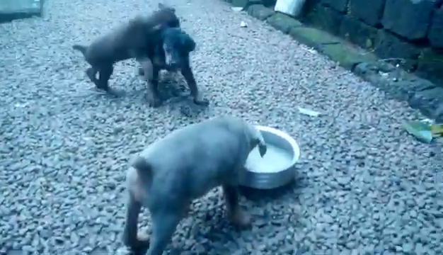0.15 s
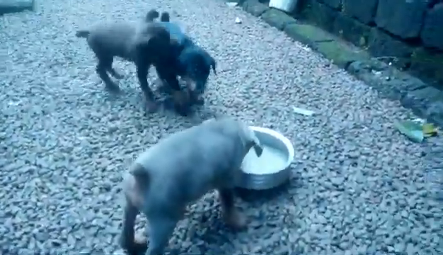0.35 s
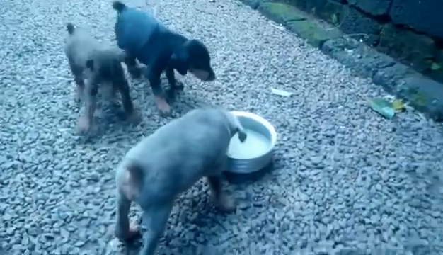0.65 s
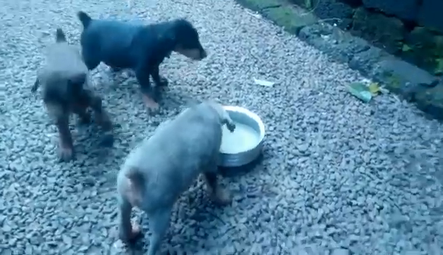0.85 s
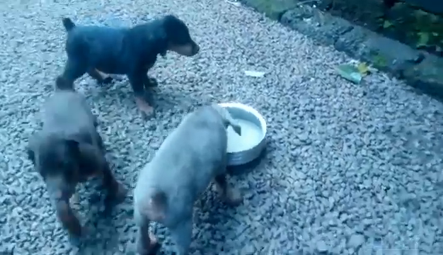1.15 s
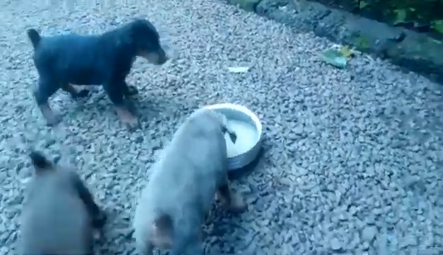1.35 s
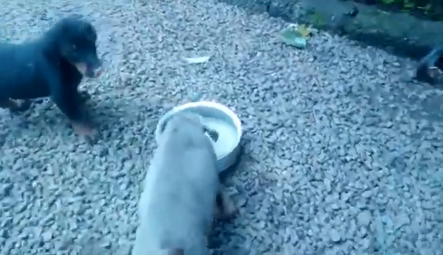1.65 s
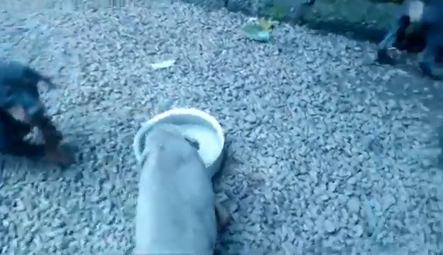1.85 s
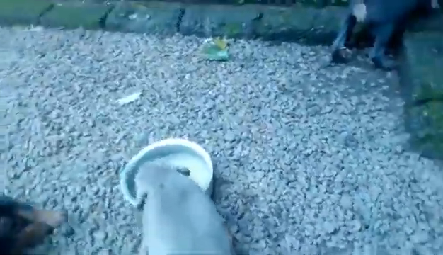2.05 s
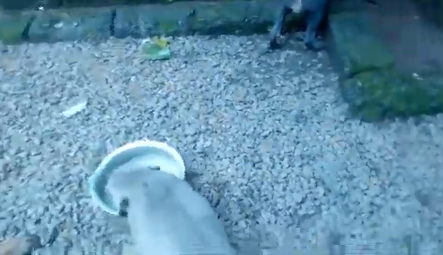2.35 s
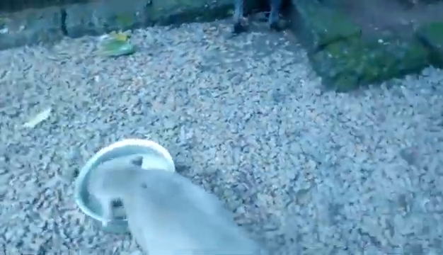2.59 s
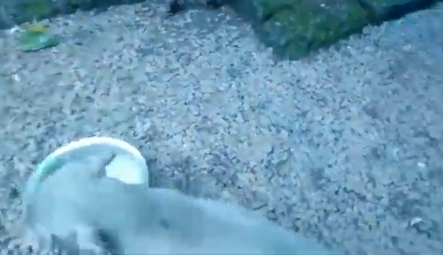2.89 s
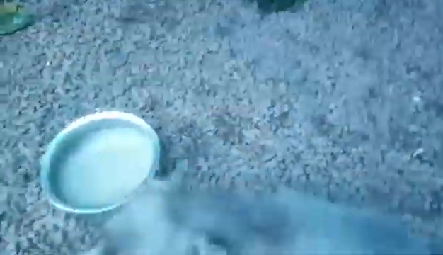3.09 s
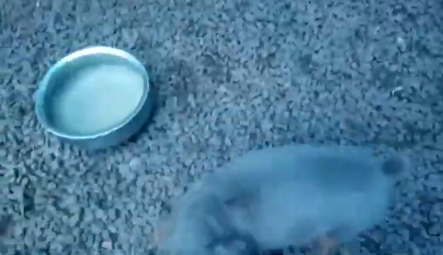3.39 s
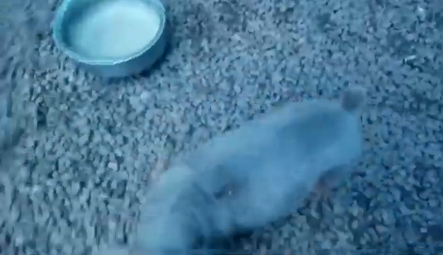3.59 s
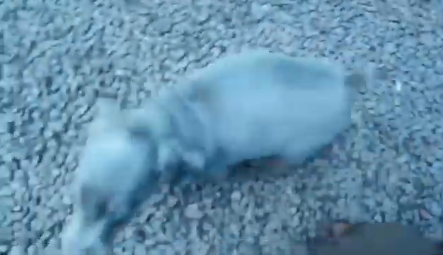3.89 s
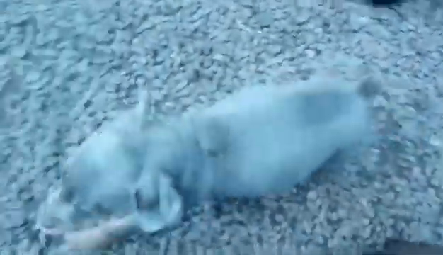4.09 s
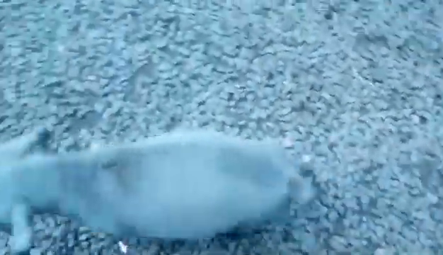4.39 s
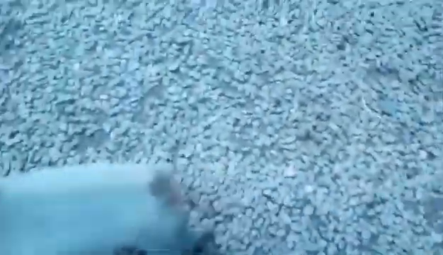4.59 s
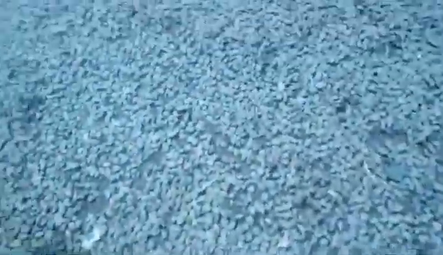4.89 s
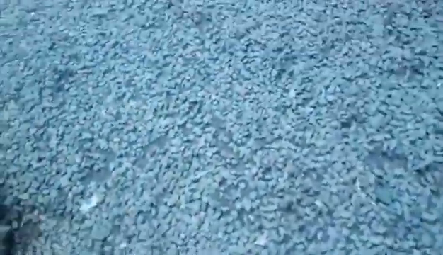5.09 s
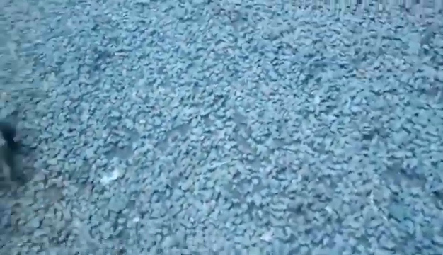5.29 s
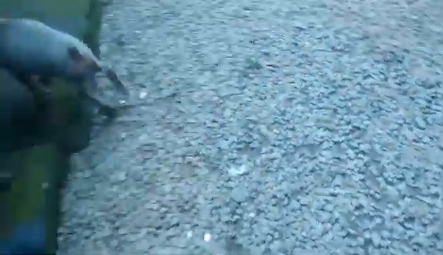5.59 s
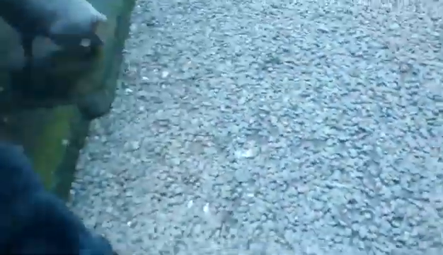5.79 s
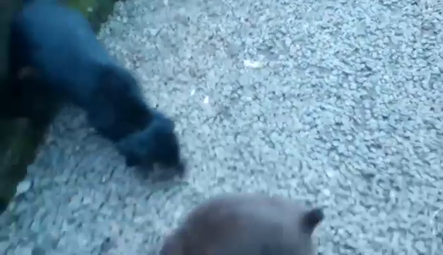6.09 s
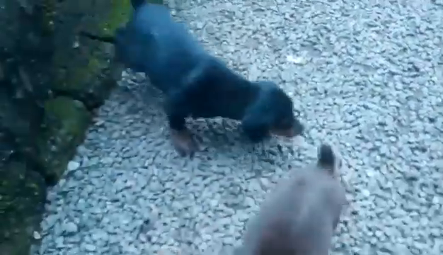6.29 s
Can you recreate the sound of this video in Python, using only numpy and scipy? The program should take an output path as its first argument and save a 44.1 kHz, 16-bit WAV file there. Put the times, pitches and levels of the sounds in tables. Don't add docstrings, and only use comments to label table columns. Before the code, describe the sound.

A young puppy yelps over and over, shrill and whistle-like, between stone walls while paws crunch and click through gravel nearby.

```python
import sys
import numpy as np
from scipy import signal
from scipy.fft import rfft, irfft, next_fast_len
from scipy.io import wavfile
from scipy.ndimage import uniform_filter1d, minimum_filter1d

SR = 44100
rng = np.random.default_rng(int(sys.argv[2]) if len(sys.argv) > 2 else 0)


def bounce(signal):
    frames = np.transpose(np.atleast_2d(signal))
    limited = np.clip(frames, -1, 1)
    pcm = np.round(limited * 32767).astype(np.int16)
    wavfile.write(sys.argv[1], SR, pcm)


def ratio_of_db(decibels):
    return 10 ** (np.asarray(decibels, float) / 20)


N = 284445


def evened(x):
    return x / np.sqrt(np.mean(x ** 2) + 1e-20)


def read(points, hz):
    f, value = np.transpose(points)
    return np.interp(np.log(hz + 1), np.log(f + 1), value)


def curve(rows):
    return np.interp(np.arange(N) / SR, *np.transpose(rows))


def colour(x, points):
    size = next_fast_len(x.shape[-1] + 2048)
    gain = ratio_of_db(read(points, np.fft.rfftfreq(size, 1 / SR)))
    return irfft(rfft(x, size) * gain, size)[..., :x.shape[-1]]


def wander(count, hz):
    steep = signal.butter(4, hz / (SR / 2), output="sos")
    return evened(signal.sosfilt(steep, rng.standard_normal(count + 2000))[2000:])


def bump(t, mid, length, power):
    return np.exp(-(abs(t - mid) / (.5 * length)) ** power)


def add(mix, s, sound):
    part = mix[..., round(s * SR):][..., :sound.shape[-1]]
    part += sound[..., :part.shape[-1]]


def puppy():
    # start_s, rise_s, hold_s, top_pitch_hz, effort_db
    plain = [
        (0.527, 0.081, 0.1, 1005, -14.5),
        (1.319, 0.041, 0.086, 925.4, -16),
        (2.838, 0.06, 0.056, 986.6, -19.5),
        (3.05, .09, 0.082, 951.3, -12),
        (4.33, 0.05, 0.091, 995, -19),
        (4.888, 0.056, 0.066, 982.6, -20),
        (5.416, 0.058, 0.096, 988, -18),
        (5.977, 0.058, 0.064, 963.3, -15.5),
    ]
    # start_s, rise_s, hold_s, top_pitch_hz, effort_db
    glides = [
        (0.25, 0.065, 0.094, 982, -19.5),
        (2.135, 0.092, 0.061, 835.5, -20.5),
        (3.86, 0.0654, 0.143, 834, -38),
    ]
    # start_s, rise_s, hold_s, top_pitch_hz, effort_db
    shrieks = [
        (1.116, 0.055, 0.048, 986, -18),
        (1.908, 0.052, 0.054, 1021, -16.5),
        (3.601, 0.061, 0.057, 1022, -21),
    ]
    # start_hz, leap (share of climb), fallback (share of climb), leap_s, fallback_s
    cries = [[*row, 760, .38, 0.0398, 0.00925, 0.0236] for row in plain]
    cries += [[*row, 760, .08, .02, 0.00925, 0.0236] for row in glides]
    cries += [[*row, 707, 0.65, .35, 0.00654, .045] for row in shrieks]
    cries.sort()
    starts, out = [c[0] for c in cries], np.zeros(N)
    for cry, last, until in zip(cries, [-1] + starts, starts[1:] + [N / SR]):
        gap_s = cry[0] - last
        if gap_s < .223:
            cry = cry[:5] + [805, .6, -0.0464, 0.00654, cry[9]]
        sag_per_s = 1.404 if gap_s < .3 else 3.286
        add(out, *yelp(*phrase(*cry, sag_per_s, until)))
    return colour(out, [(200, 3.0), (680, 2.35)])


def phrase(start, rise, hold, top_hz, db, start_hz, jump, fallback, jump_s, fallback_s, sag, until):
    first_levels = [-34.5, -23.5, -2, -3.5, -1, -1, -24.5]
    octave_levels = [-21, -27.5, -10, -19, -9.5, -15, -36]
    upper_levels = [-30.5, -19, -13, -12.5, -11.5, -16.5, -53]
    whine_first = [-3.5, 0, -0.5, -29]
    whine_octave = [-8, -10.5, -17.5, -19]
    whine_upper = [-13, -10, -12.5, -36]
    # start_s, length_s, first_pitch_hz, last_pitch_hz, effort_db
    whines = [(0.445, 0.059, 744, 721, -39), (0.769, 0.17, 784.7, 766.4, -45),
              (1.539, 0.22, 794.7, 776.6, -32.5), (2.292, 0.32, 783.2, 771.3, -32.5),
              (2.619, 0.07, 760, 719, -50.5), (3.246, 0.16, 822.6, 748, -35), (3.78, 0.17, 801, 760, -38),
              (4.074, 0.038, 811, 765, -39), (4.522, .21, 834, 765, -43.5), (5.09, 0.12, 890, 801, -34),
              (5.605, 0.2, 817, 755, -43.5), (6.13, 0.21, 882, 655, -34.5)]
    rest_hz, onset, release_s = 751.7, 0.26, 0.0854
    tire_db_per_hz = 0.1257
    top, end = start + rise, start + rise + hold
    climb, glide_hz = top_hz - rest_hz, (top_hz - start_hz) * (1 - jump)
    held_hz = top_hz - climb * fallback
    end_hz = held_hz - climb * sag * (hold - fallback_s)
    s = [start, start + onset * rise, top - jump_s, top, top + fallback_s, end, end + release_s]
    hz = [start_hz, start_hz + .65 * glide_hz, start_hz + glide_hz, top_hz, held_hz, end_hz, end_hz * .93]
    rows = list(zip(s, hz, *(db + np.array([first_levels, octave_levels, upper_levels]))))
    trail = [w for w in whines if start < w[0] < until]
    if trail:
        rows.pop()
    for at, length, first_hz, last_hz, whine_db in trail:
        share = np.array([0, .18, .85, 1])
        tired_db = whine_db - tire_db_per_hz * share * (first_hz - last_hz)
        levels = tired_db + np.array([whine_first, whine_octave, whine_upper])
        rows += zip(at + share * length, first_hz + share * (last_hz - first_hz), *levels)
    return top, jump, sorted(rows)


def yelp(top, jump, rows):
    # s, opening (0-1.5, lets upper partials out), resonance_hz, nasal_octave_lift_db
    mouth_moves = [(.3, 0.73, 3130, 4), (.65, 0.6, 3150, -8.5), (.82, 0.89, 2700, 10.5),
                   (0.86, 1.5, 3680, -4), (.96, 0.84, 3400, 32), (1.13, 0.8, 2130, -5),
                   (1.201, 0.52, 2420, -3.5), (1.3, 0, 2400, 1), (1.4, 0.47, 2800, -15),
                   (1.55, 0.2, 2580, -9.5), (1.62, 0.39, 2410, 3.5), (1.74, 0.39, 2400, -1),
                   (1.92, 0.8, 2150, -5), (1.97, 0.46, 2180, -18.5), (2.1, 0.72, 2280, 13.5),
                   (2.249, 0.31, 2470, -9.5), (2.561, 0.37, 2190, 10), (2.632, 0.83, 3740, 12.5),
                   (2.881, 0.77, 2580, 3.5), (3.0, 0.21, 2500, -5.5), (3.17, 0.44, 2960, 0),
                   (3.28, 0.75, 3350, 7.5), (3.42, 1, 2250, 7), (3.62, 0.78, 2580, 2.5),
                   (3.7, 0.72, 2690, -1.5), (3.82, 0.65, 3080, 2), (4.001, 1.12, 3860, 19.5),
                   (4.35, 0.76, 2960, 3.5), (4.43, 0.41, 3170, -7.5), (4.6, 0.57, 3330, 0.5),
                   (4.92, 0.74, 3180, -9.5), (5.001, 0.58, 3160, 2), (5.151, 0.1, 2740, -5),
                   (5.45, 0.72, 2830, -6), (5.54, 0.69, 2820, 2.5), (5.7, 0, 2660, -14),
                   (6.02, 0.67, 2870, -3), (6.1, 0.46, 3080, -9.5), (6.25, 0.3, 2800, 7)]
    # middle_s, length_s, pitch_loss (share), octave_lift_db
    flicks = [
        (0.932, 0.0374, 0.098, 6),
        (1.753, 0.034, 0.16, 17),
        (2.688, 0.04, 0.15, 18),
        (3.429, 0.058, 0.045, 28),
        (4.135, 0.063, 0.1, 30),
        (4.7, 0.066, 0.064, 14.5),
        (5.79, .05, 0.074, 28),
        (6.285, 0.059, 0.047, 14),
    ]
    # middle_s, length_s, roughness (-0.11 to
    cracks = [(.33, .08, .4, .1), (.62, .07, .4, .1), (1.19, .08, .6, .2), (1.985, .09, .55, .2),
              (2.93, .11, .55, .3), (3.23, .1, .3, .6), (3.7, .09, .6, .1), (4.12, .05, .7, .5),
              (4.385, .04, .5, .1), (4.7, .05, .6, .6), (4.95, .05, .55, .1), (5.48, .045, .5, .1),
              (6.05, .06, .5, 0), (.93, .05, .9, 0), (1.75, .04, .5, 0), (3.43, .05, .5, .3),
              (5.8, .05, .6, .6), (6.3, .06, .6, .7), (.45, .05, .3, 0), (.75, .06, .3, 0),
              (1.42, .13, -.11, 0), (2.5, .2, .04, 0), (.68, .06, -.08, 0)]
    # frequency_hz, level_db
    throat = [(1200, -6), (2000, 2), (2800, -1), (3800, 0), (4700, -4), (5500, -17.5), (7000, -27),
              (9000, -53)]
    # frequency_hz, level_db
    airy = [(500, -23), (1000, -2.5), (1300, -4.5), (2200, -7.5), (4000, -16), (7000, -43), (10000, -90)]
    # middle_s, length_s, level_db
    wavers = [(0.353, 0.011, -27), (0.417, 0.014, -8), (0.649, .03, 2.5), (0.687, 0.036, -3.5),
              (1.44, 0.0076, -4), (1.56, .05, -4.5), (2.402, 0.068, -7), (3.191, 0.049, -7.5),
              (4.438, 0.014, -2), (5.505, 0.039, -0.5), (6.061, .02, -3.5)]
    # middle_s, length_s, beats_hz, depth (0-1)
    throbs = [
        (1.197, 0.03, 46.5, 0.64),
        (1.992, 0.049, 43.7, 0.65),
        (2.958, 0.12, 65.7, 0.84),
        (3.71, 0.13, 64.6, 0.43),
    ]
    longest = 32000
    s, *columns = np.transpose(rows)
    t = np.arange(s[0], s[-1], 1 / SR)
    hz, first_db, octave_db, upper_db = (np.interp(t, s, c) for c in columns)

    def drift(rate_hz):
        return wander(longest, rate_hz)[:len(t)]

    when, *shape = np.transpose(mouth_moves)
    wide, mouth_hz, nasal_db = (np.interp(t, when, c) for c in shape)
    gives = np.array([bump(np.minimum(t, mid), mid, length, 2) * (mid > t[0]) for mid, length, _, _ in flicks])
    lost, lift_db = np.transpose(flicks)[2:] @ gives
    hz = hz * (1 - lost)
    first_db = first_db - 0.31 * lift_db
    octave_db = octave_db + nasal_db + lift_db
    upper_db = upper_db + 38 * (wide - 0.55)

    bumps = np.array([bump(t, mid, length, 4) for mid, length, _, _ in cracks])
    rough, wobble = np.transpose(cracks)[2:] @ bumps
    rough = np.maximum(rough + .11 * np.clip((hz - 790) / 150, .1, 1), .01)
    ragged = 1 + .008 * np.sqrt(np.minimum(rough / .12, 1)) * drift(25)
    steady = 2 * np.pi * np.cumsum(uniform_filter1d(hz, 200) * ragged) / SR
    shaken = 2 * np.pi * np.cumsum(hz * .05 * rough * drift(110)) / SR
    phase = steady + shaken
    flutter = []
    for k in range(8):
        fast = np.sqrt(k * rough) * .45 * drift(55)
        flutter.append(1 + fast + .22 * np.sqrt(max(k - 1, 0)) * drift(12))
    halved = 1 + wobble * np.cos(phase / 2)

    def mouth_gain(f):
        resonance = 1 / (1 + ((f - mouth_hz) / 450) ** 2)
        return ratio_of_db(read(throat, f)) * (0.35 * ratio_of_db(-20 * np.maximum(wide - .8, 0)) + resonance)

    higher = sum(flutter[k] * mouth_gain(k * hz) * np.cos(k * phase) for k in range(3, 8))
    breath = evened(colour(rng.standard_normal(longest), [(500, -55.0), (900, -24)] + throat))[:len(t)]
    octave = np.sqrt(2) * flutter[2] * ratio_of_db(octave_db) * np.cos(2 * steady + 1.4 * shaken)
    held_db = -25 * jump * np.exp((np.minimum(t, top) - top) / 0.025) * np.clip((top - t) / 0.0036, 0, 1)
    first = np.sqrt(2) * ratio_of_db(first_db + held_db) * flutter[1] * np.cos(steady + .4 * shaken)
    leak = ratio_of_db(first_db - 30) * evened(colour(rng.standard_normal(longest), airy))[:len(t)]
    voice = first + halved * (octave + ratio_of_db(upper_db) * higher) + ratio_of_db(upper_db - 2.5) * rough * breath + leak
    waver_db = sum(db * bump(t, mid, length, 2) for mid, length, db in wavers)
    beats = 1 + sum(depth * bump(t, mid, length, 4) * np.cos(2 * np.pi * beat_hz * (t - mid))
                    for mid, length, beat_hz, depth in throbs)
    return rows[0][0], ratio_of_db(waver_db) * beats * voice * signal.windows.tukey(len(t), .06)


def walls(x, t60s, direct_db, size=256):
    taps = np.zeros((2, SR))
    at = np.arange(200, SR - 20, 20) + rng.integers(0, 20, (2, (SR - 201) // 20))
    np.put_along_axis(taps, at, rng.choice([-1., 1.], at.shape), 1)
    hz, t, z = signal.stft(taps, SR, nperseg=size)
    fade = ratio_of_db(-60 * t / read(t60s, hz)[:, None])
    tail = signal.istft(z * fade, SR, nperseg=size)[1]
    tail /= np.linalg.norm(tail[0])
    return ratio_of_db(direct_db)[:, None] * x + signal.fftconvolve(np.atleast_2d(x), tail, axes=1)[:, :N]


def puppy_between_walls():
    # s, right_port_lag (samples), right_port_db
    turn = [
        (.3, -9, 4),
        (.7, -3.5, 1),
        (1.7, -5, 0),
        (2.2, 1.5, 3),
        (3.2, 9.5, 0.5),
        (3.7, 8.5, 0.5),
        (4.4, -5, 1),
        (5.0, 0.5, 1.5),
        (5.5, -6, 0.5),
        (6.1, -7.5, 2.5),
    ]
    # frequency_hz, t60_s
    near_walls = [(500, 0.34), (1500, 0.1), (5000, 0.22)]
    # frequency_hz, t60_s
    far_walls = [(500, 0.23), (820, 0.73), (920, 0.67), (1010, 0.74), (1200, 0.17), (2400, 0.45),
                 (4000, 0.46), (9000, 0.38)]
    # frequency_hz, level_db
    nook = [(700, 1), (880, -9), (960, -10.5), (1040, -4.5), (1500, 7.5), (5000, -7)]
    voice = puppy()
    lag = curve([row[:2] for row in turn])
    right_gain = ratio_of_db(curve([(s, db) for s, _, db in turn]))
    right = right_gain * np.interp(np.arange(N) - lag, np.arange(N), voice)
    voice = np.array([voice, right])
    shadowed = ratio_of_db([[5], [0]]) * colour(voice, [(1200, 0), (2200, -6)])
    corner = shadowed + walls(voice, near_walls, np.array([-60., -60.]))
    ringing = walls(colour(voice, nook), far_walls, np.array([-40., -40.]), size=1024)
    return ratio_of_db(-1.5) * corner + ratio_of_db(-5.5) * ringing


def tread():
    # s, level_db, length_s
    steps = [(0.055, -42, 0.13), (0.29, -49, 0.42), (0.518, -51, 0.053), (0.965, -58.5, 0.73),
             (1.348, -48, 0.15), (1.506, -50.5, 0.14), (1.659, -42, 0.056), (1.975, -41, 0.089),
             (2.104, -44, 0.24), (2.377, -50.5, 0.088), (2.635, -56.5, 1), (2.84, -41, 0.34),
             (3.101, -29, 0.023), (3.29, -49.5, 0.2), (3.376, -42, 0.037), (3.564, -52.5, 0.072),
             (3.673, -52, 0.075), (3.826, -42.5, 0.19), (4.149, -38, 0.06), (4.254, -48.5, 0.24),
             (4.425, -54, 0.67), (4.918, -47, 0.17), (5.103, -55.5, 0.063), (5.231, -49, 0.12),
             (5.494, -51, 0.031), (5.645, -46.5, 0.4), (5.832, -48, 0.049), (6.037, -47.5, 0.058),
             (6.24, -49, 0.54), (6.44, -48, 0.02)]
    press, step_db, shuffle_db = .35, 12, -68
    t = np.arange(0, N + 64, 64) / SR
    falls = (db - step_db * np.maximum((t - s) / length, (s - t) / (press * length)) for s, db, length in steps)
    power = ratio_of_db(shuffle_db) ** 2 + sum(ratio_of_db(db) ** 2 for db in falls)
    return np.interp(np.arange(N) / SR, t, np.sqrt(power))


def stones(strikes, kinds, decay_s):
    # frequency_hz, level_db
    pebble = [(700, -31.5), (1500, -17.5), (3000, -18), (5000, -8), (7500, -0.5), (10200, 3), (11500, -5),
              (12200, -7.5), (14800, -11.5), (16000, -68)]
    kind, t, out = rng.integers(0, kinds, N), np.arange(256) / SR, np.zeros((2, N))
    for k in range(kinds):
        life = t / (decay_s * rng.uniform(1.0, 2.6))
        burst = rng.standard_normal((2, len(t))) * life * np.exp(-life)
        low_db, high_db = rng.uniform(-0.6, 14.0), rng.uniform(-22.0, 1.0)
        burst = colour(burst, [(2500, low_db), (8000, 0.014), (10500, 0.013), (13500, high_db)])
        burst /= np.linalg.norm(burst[0])
        out += signal.oaconvolve(strikes * (kind == k), burst, axes=1)[:, :N]
    return colour(out, pebble)


def crunch():
    per_s = 2500 * ratio_of_db(2.8 * wander(N, 30))
    size = ratio_of_db(4.34 * np.minimum(rng.exponential(1, N), 5)) * (rng.random(N) < per_s / SR)
    grains = evened(stones(size[None], kinds=12, decay_s=0.00039))
    scatter = walls(grains, [(500, 0.19), (9000, 0.036)], np.array([4.5, 4.5]))
    return tread() * ratio_of_db(13.5) * colour(evened(scatter), [(13000, 0.5), (14300, -1), (15000, -12)])


def clicks():
    # s, peak_db
    knocked = [(0.0522, -17), (0.842, -25.5), (1.0869, -25.5), (1.2929, -18), (1.3409, -10), (1.4712, -14),
               (1.6492, -14.5), (1.937, -17.5), (2.6492, -12), (2.736, -19.5), (2.7848, -9), (2.828, -9),
               (2.997, -11), (3.0941, -22), (3.1592, -14.5), (3.3381, -16.5), (3.4627, -17), (3.55, -19),
               (3.8035, -11), (3.92, -11), (4.0639, -8), (4.1397, -21), (4.4288, -15), (4.4543, -14),
               (4.54, -17), (4.816, -46), (4.8314, -15.5), (5.081, -22.5), (5.4563, -19.5), (5.5037, -7.5),
               (0.3197, -22.5), (0.524, -21), (1.6836, -10), (2.267, -18), (2.687, -17), (3.4106, -20.5),
             (3.493, -22), (3.5707, -18.5), (4.257, -14.5), (4.347, -30), (4.7677, -18), (4.8755, -27),
             (5.2046, -22.5), (6.1689, -19.5), (6.256, -15.5), (6.3072, -9),
               (.03, -28), (.222, -20), (0.292, -40), (.801, -39), (.93, -28), (0.981, -27.5), (1.215, -28.5),
             (1.31, -20), (1.619, -24.5), (2.3457, -30), (2.459, -29), (2.5795, -27.5), (2.6123, -22.5),
             (2.8706, -14), (3.1075, -21), (3.2139, -20.5), (3.238, -23), (3.2635, -34), (3.2787, -25),
             (3.3159, -25), (3.3882, -24), (3.5027, -16), (3.68, -23), (3.72, -23.5), (4.3909, -18),
             (4.6121, -19.5), (5.1158, -23), (5.5668, -22), (6.154, -25), (6.231, -18), (6.2943, -22)]
    kicked = (rng.random(N) < 3 / SR) * rng.random((2, N))
    strikes = kicked * np.minimum(tread() * ratio_of_db(27), ratio_of_db(-44.0))
    single = knocked
    for (s, db), side_db in zip(single, rng.uniform(-0.98, 1.7, len(single))):
        strikes[:, round(s * SR) - 12] = ratio_of_db([db + side_db, db - side_db])
    hard = colour(stones(strikes, kinds=14, decay_s=0.00093),
                  [(3000, -8), (6000, -7.0), (10500, -3.0), (12500, -6.5), (15000, -6)])
    return ratio_of_db(11.5) * walls(hard, [(500, 0.035), (9000, 0.11), (14000, 0.046)], np.array([12., 12.]))


def sparks():
    # s, peak_db
    struck = [(0.0508, -44), (1.3009, -47), (1.3009, -21), (1.3414, -20), (1.6636, -37), (2.2418, -38),
              (2.7347, -43), (2.7836, -40), (2.9996, -34), (3.0934, -25), (3.8023, -31), (3.92, -42),
              (4.0627, -40), (4.4288, -35), (4.5391, -34), (4.816, -41), (5.5044, -37), (6.3076, -37)]
    strikes = np.zeros(N)
    for s, db in struck:
        strikes[round(s * SR)] = ratio_of_db(db + 14.0)
    snaps = colour(strikes, [(2000, -22), (6000, -10), (11000, -1), (13500, 0), (15500, -6), (16500, -27)])
    return walls(snaps, [(500, .02), (9000, 0.038), (14000, 0.056)], np.array([6., 6.])) * ratio_of_db(-4.0)


def knocks():
    # s, peak_db, pitch_hz, decay (cycles)
    large = [
        (.051, -55, 3000, 0.81),
        (4.254, -43, 3000, 2.2),
        (5.833, -42.5, 1420, 2),
        (6.309, -42, 2170, 0.61),
        (2.5, -28, 2920, 4.4),
        (2.6, -35.5, 3760, 41),
        (4.761, -44, 2940, 7.2),
        (4.835, -39.5, 2630, 5.1),
        (5.215, -18.5, 1830, 1),
    ]
    out = np.zeros((2, N))
    for s, db, hz, cycles in large:
        turns = np.arange(round(10 * cycles / hz * SR)) * hz / SR
        ring = sum(np.sin(2 * np.pi * ((1 + spread / cycles) * turns + rng.random((2, 1))))
                   for spread in (-.15, 0, .2))
        add(out, s, ratio_of_db(db + 5.5) * ring * turns / cycles * np.exp(-turns / cycles))
    return out


def thuds():
    # s, peak_db, centre_hz
    puffs = [(0.151, -39.5, 274), (0.647, -43, 523), (1.179, -41, 353), (1.329, -43, 440),
             (2.258, -47, 346), (2.355, -47, 205), (2.597, -43, 284), (2.877, -43.5, 267),
             (3.116, -41, 238), (4.207, -45, 232), (5.066, -50, 149), (5.547, -34, 136)]
    out, t = np.zeros((2, N)), np.arange(4000) / SR
    for s, db, hz in puffs:
        band = [(0.063 * hz, -40), (0.89 * hz, -3), (hz, 0), (3 * hz, -9), (7 * hz, -35), (9000, -90)]
        puff = evened(colour(rng.standard_normal((2, len(t))), band))
        add(out, s, ratio_of_db(db + 13.0) * puff * t / 0.02 * np.exp(-t / 0.011))
    return out


def air():
    # frequency_hz, level_db
    hiss_colour = [(15, -58), (40, -24), (60, -10), (108, -10.5), (206, -6.5), (256, -11.5), (714, -17),
                   (930, -4), (1130, -10), (1290, -11), (6380, -86), (10100, -30), (14000, -36),
                   (15000, -46), (16000, -69)]
    # s, level_db
    hum = [
        (0.0, -67.5),
        (1.17, -76),
        (2.87, -62.5),
        (3.65, -77.5),
        (5.21, -67),
        (5.87, -77),
        (6.45, -77),
    ]
    hiss = ratio_of_db(-58.0) * evened(colour(rng.standard_normal((2, N)), hiss_colour))
    drone_band = [(60, -35), (88, -7.0), (100, -4.5), (112, -8.5), (160, -25.0), (300, -88.0)]
    drone = evened(colour(rng.standard_normal((2, N)), drone_band))
    return hiss + ratio_of_db(curve(hum) + 13.0) * drone


def scene():
    gravel = crunch() + clicks() + sparks() + knocks() + thuds()
    return puppy_between_walls() + gravel + air()


def thin_out(x):
    hz, _, z = signal.stft(x, SR, nperseg=1024, noverlap=512)
    level_db = 10 * np.log10((abs(z[:, :512]) ** 2).reshape(2, 64, 8, -1).mean(2) + 1e-16)
    need = [(300, -70), (2000, -57), (3500, -34), (6000, -27.0), (10500, -53.0), (12000, -34.0), (16000, -55.5)]
    need_db = read(need, hz[4:512:8])
    whim_db = 6 * evened(uniform_filter1d(rng.standard_normal(level_db.shape), 4))
    neighbour_db = -minimum_filter1d(-level_db, 7, axis=1)
    neighbour_db[:, :3] = -200
    keep = level_db + whim_db > level_db.max(1, keepdims=True) * .45 - 28 + need_db[:, None]
    keep &= level_db + whim_db > neighbour_db - 32
    z[:, :512] *= np.repeat(np.where(keep, 1, .03), 8, 1)
    top = abs(z[:, hz > 11600])
    treble_db = level_db[:, 20:30].mean(1)
    steady = treble_db < uniform_filter1d(treble_db, 5) + 2.5
    strongest = 1.5 * (top > 1.7 * uniform_filter1d(top, 16, 1))
    z[:, hz > 11600] *= np.where(steady[:, None], strongest, 1)
    z[:, hz > 16500] = 0
    return signal.istft(z, SR, nperseg=1024, noverlap=512)[1][:, :N]


def band_limit(x):
    return signal.sosfilt(signal.butter(12, 16500, fs=SR, output="sos"), x)


def record(dry):
    # frequency_hz, level_db
    right_port = [(60, -7.5), (250, -8), (600, -8), (950, -18), (1400, -9.5), (2500, -7.5), (8000, -6.5),
                  (12000, -3.5), (15000, 4.5)]
    ports = np.array([dry[0], colour(dry[1], right_port)])
    lopsided = colour(ports ** 2, [(8, -46.0), (30, 4), (80, 19.5), (600, 15.0), (1500, -42.0)])
    bent = ports + 0.012 * lopsided
    crest = uniform_filter1d(-minimum_filter1d(-abs(bent), 400), 200)
    limited = bent / np.maximum(crest / .94, 1)
    return band_limit(thin_out(limited))


dry = scene()
out = record(dry)
bounce(out)
```